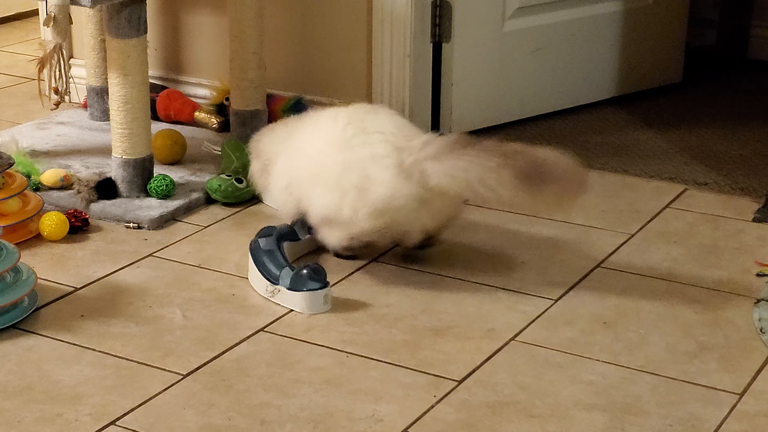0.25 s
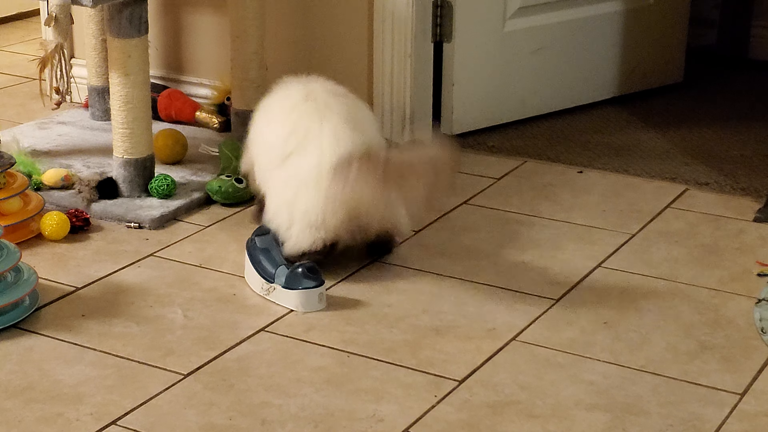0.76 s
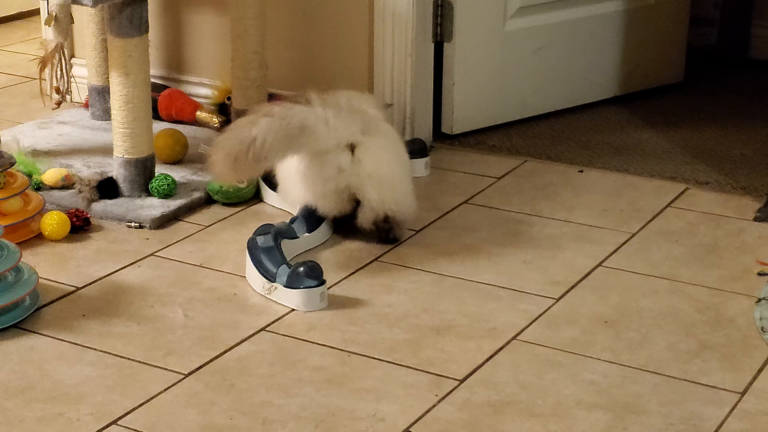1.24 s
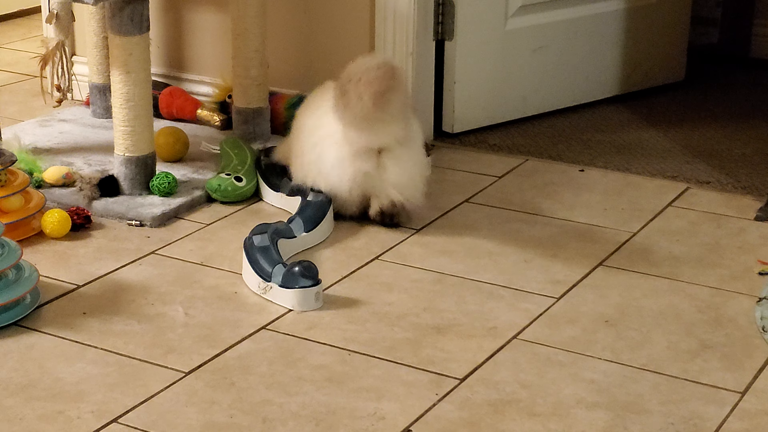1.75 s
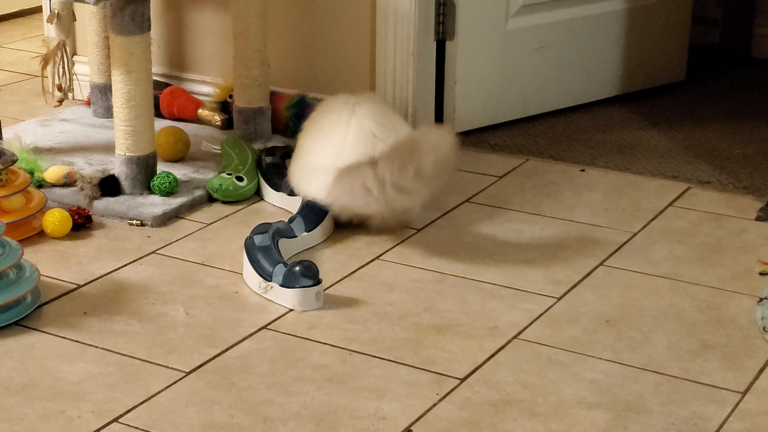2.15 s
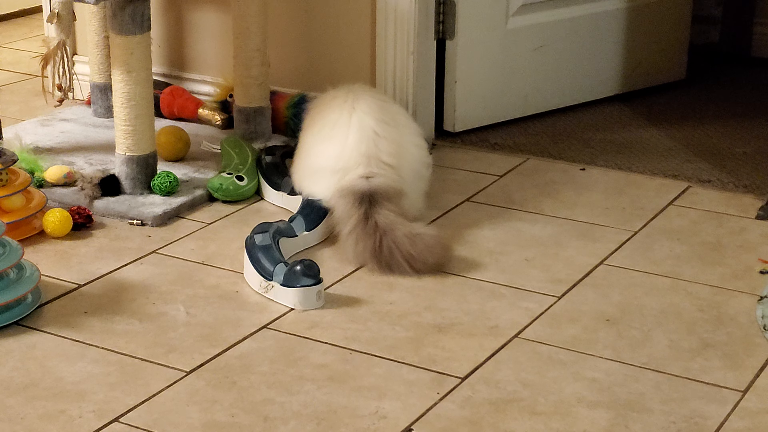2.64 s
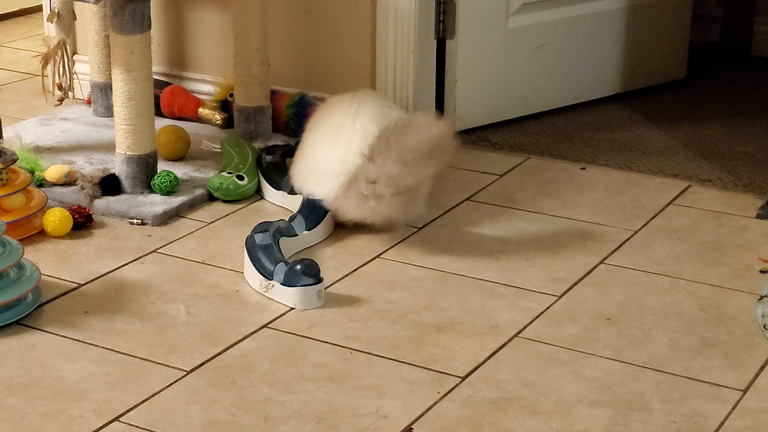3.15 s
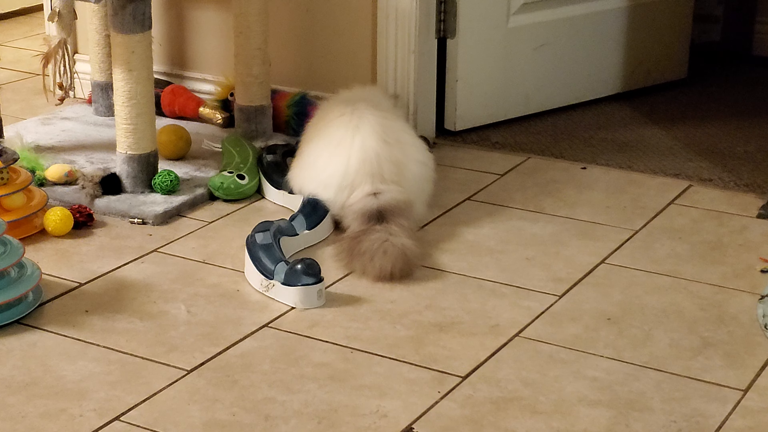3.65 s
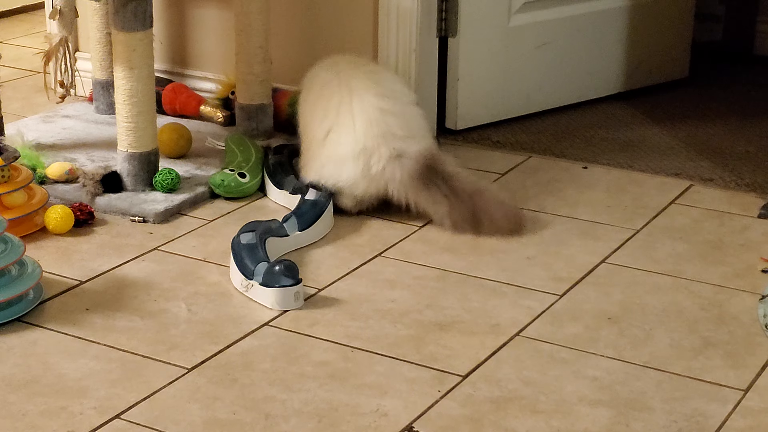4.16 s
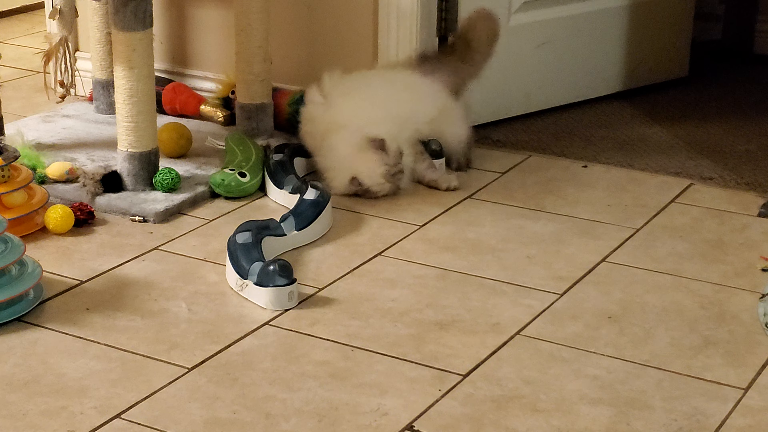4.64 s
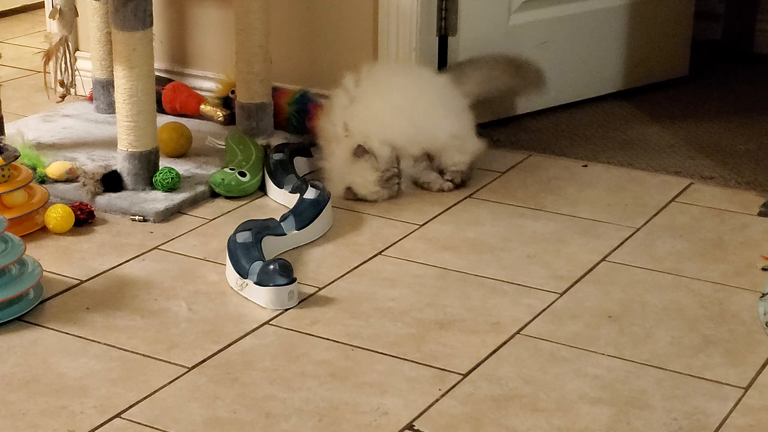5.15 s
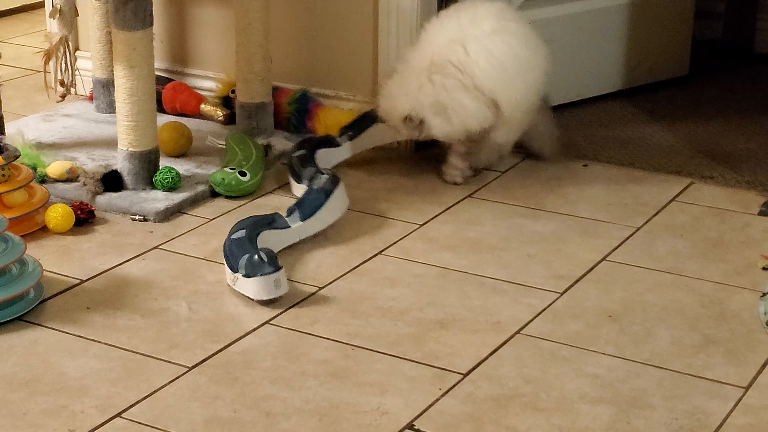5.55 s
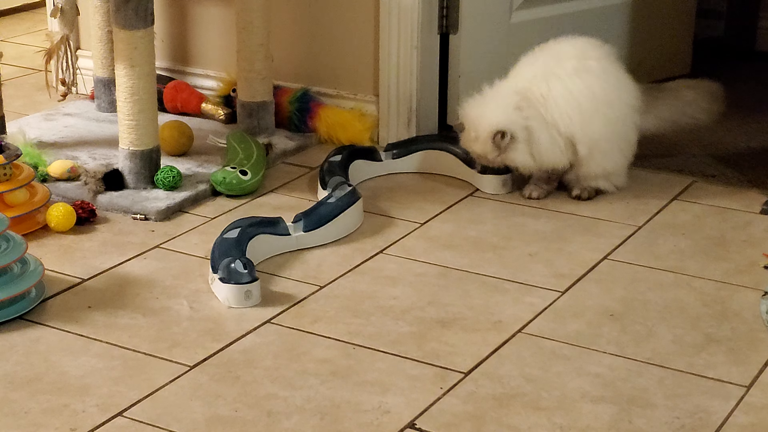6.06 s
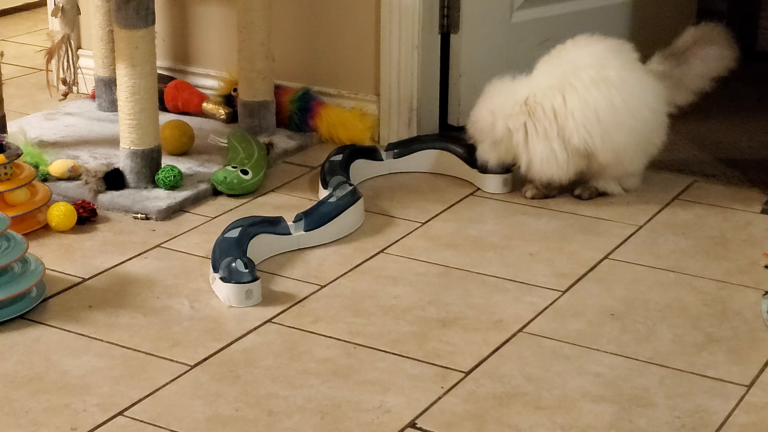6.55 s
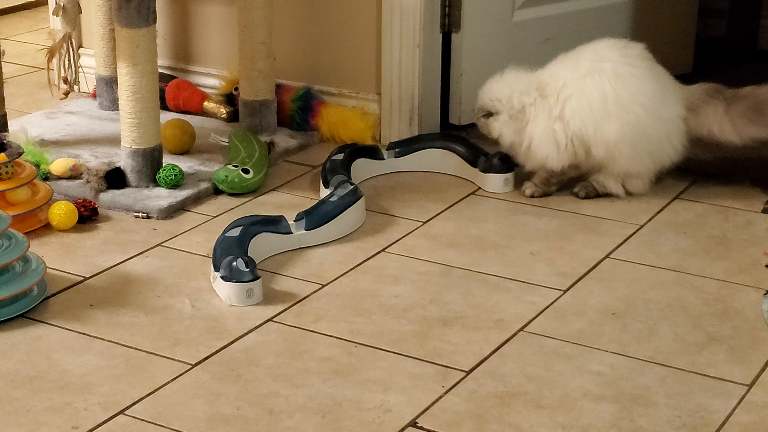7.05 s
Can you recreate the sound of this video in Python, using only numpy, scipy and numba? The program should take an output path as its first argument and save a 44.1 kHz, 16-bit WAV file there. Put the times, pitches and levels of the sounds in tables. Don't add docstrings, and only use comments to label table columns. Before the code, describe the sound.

A cat bats a ball in a hollow plastic track toy on a tiled floor. A busy cluster of clacks, ticks and short scrapes comes first, then sparser, softer taps, then loud isolated cracks and knocks as the track is pushed, ending in faint taps. A fridge-like hum runs beneath. Bare reflective room, phone microphone a few metres away.

```python
import sys
import numpy as np
from scipy import signal
from scipy.fft import rfft, irfft
from scipy.io import wavfile
from scipy.ndimage import uniform_filter1d
from numba import njit

SR = 44100
rng = np.random.default_rng(int(sys.argv[2]) if len(sys.argv) > 2 else 0)


def volts_from_db(level):
    exponent = np.asarray(level, float) / 20
    return 10 ** exponent


def file_out(sig):
    cols = np.atleast_2d(sig).T
    lim = np.clip(cols, -1, 1)
    pcm = np.round(lim * 32767).astype(np.int16)
    wavfile.write(sys.argv[1], SR, pcm)


N = 321930
BINS_HZ = np.linspace(0, SR / 2, 2049)

# frequency in Hz, level in dB per Hz.
AIR_SPECTRUM = [(20, -42), (38, -24), (50, -11), (85, -13.5), (230, -7), (400, -9.5), (700, -14.5),
                (1300, -26.5), (1600, -33), (2000, -32.5), (3200, -41), (4900, -39.5), (5900, -52.5),
                (8000, -53), (15000, -49)]
# frequency in Hz, rms level in dB, wobble in dB.
MOTOR_TONES = [(47, -77.5, 2.5), (59.2, -69, 6.5), (171, -75, 1.5), (218.2, -65.5, 6), (234.3, -66, -4),
               (386.6, -74, 1), (704.3, -60.5, 1.5), (1876, -95.5, 3.5), (4670, -101, -4),
               (4720, -96.5, -5)]
# time in seconds, level in dB.
LOAD_TONE = [(0.0, -86), (0.47, -74), (0.83, -83), (1.1, -64), (1.34, -69.5), (4.0, -63.5), (4.33, -59),
             (4.88, -66), (5.81, -61), (6.69, -66), (7.3, -62)]
# frequency in Hz, likeness from 0 to 1.
PORT_LIKENESS = [(100, 1), (290, 0.73), (640, .55), (1400, 0.02), (5000, 0.01)]
# frequency in Hz, left minus right in dB.
PORT_DIFFERENCE = [(60, -6.5), (110, -5.5), (200, -4), (380, -2), (700, -6), (1290, -1), (2380, 1),
                   (4400, -7), (8120, 2.5), (15000, -8)]
# frequency in Hz, time to fall 60 dB in seconds.
ROOM_T60 = [(200, 0.73), (1000, 0.4), (4000, 0.42), (12000, 0.34)]
# frequency in Hz, level in dB per Hz.
SHELL_SPECTRUM = [(200, -24.5), (500, -10), (800, -7.5), (1000, -1.5), (1400, -1), (2300, -4.5),
                  (2800, -11.5), (5000, -30), (16000, -70)]
# frequency in Hz, level in dB per Hz.
RIM_SPECTRUM = [(1500, -35.5), (2200, -2), (2600, 1), (2900, 1.5), (3250, 1), (3800, -1.5), (4500, -0.5),
                (5100, -5.5), (5800, -28), (16000, -75.5)]
# frequency in Hz, level in dB per Hz.
TREBLE_SPECTRUM = [(4500, -27.5), (5800, 1), (7000, -6), (8200, -13), (10000, -8.5), (13000, -15.5),
                   (16000, -14)]
# frequency in Hz, level in dB per Hz.
THUMP_SPECTRUM = [(100, -11), (200, -3.5), (450, -2.5), (600, 0.5), (800, 1.5), (1100, -10.5), (1600, -46)]
# full from in seconds, held for in seconds,
# level in dB, ring in Hz, brightness in dB.
SLIDES = [(0.17, 0.043, -44.5, 1580, -14.5), (0.345, 0.06, -33, 1170, -21.5), (0.43, 0.037, -44, 1270, -36),
          (0.635, 0.074, -42.5, 1250, -15), (0.79, .03, -43.5, 1900, -13.5),
          (0.855, 0.022, -39, 2250, -8.5), (0.93, 0.028, -47, 1090, -35), (1.35, .02, -51, 1300, -28),
          (1.445, 0.047, -43.5, 1740, -20), (2.77, 0.043, -62.5, 1280, -40), (3.95, 0.12, -50, 1400, -20.5),
          (5.535, .01, -36.5, 1240, -34.5), (5.8, .06, -45.5, 1450, -32.5), (5.94, 0.054, -59, 1520, -38.5),
          (6.41, 0.044, -53.5, 945, -42), (6.48, 0.085, -55, 1140, -34.5), (6.58, .03, -56, 940, -52),
          (6.87, .1, -59.5, 966, -58)]
# start in seconds, held for in seconds, level in dB,
# ring in Hz, brightness in dB.
SKIDS = [(0.0, 0.0044, -43.5, 920, -34), (1.095, 0.023, -35, 1780, -13), (1.722, 0.024, -42.5, 1720, -16),
         (2.015, 0.056, -54.5, 1470, -24), (2.245, 0.038, -45.5, 1210, -18),
         (2.462, 0.013, -40, 970, -30.5), (2.56, 0.071, -58, 1300, -24), (3.09, .02, -54.5, 1210, -59),
         (2.836, 0.034, -49.5, 1390, -28), (3.634, 0.029, -51.5, 1247, -33.5),
         (6.612, 0.004, -51.5, 993, -46), (7.03, 0.0083, -51.5, 1284, -17)]
# start in seconds, peak in dB, ring in Hz.
TICKS = [(0.3324, -38, 3790), (0.406, -31, 3530), (0.6519, -34, 4380), (0.834, -30, 4370),
         (0.8902, -30, 4500), (1.114, -38, 3340), (2.0107, -50, 4550), (2.613, -50, 3900),
         (3.6326, -60, 3180), (3.9672, -55, 4700), (7.029, -40.5, 3270)]
# start in seconds, peak in dB, ring in Hz.
HOLLOW_TAPS = [(0.009, -38.5, 937), (0.315, -30, 840), (0.344, -26, 754), (0.361, -25, 850),
               (0.384, -23.5, 870), (0.424, -36, 735), (0.693, -34.5, 690), (0.959, -36, 1020),
               (2.019, -45, 1100), (2.246, -40, 1250), (2.466, -38, 960), (2.482, -39, 990),
               (3.094, -47.5, 700), (5.561, -38, 1030), (5.661, -18, 1050), (5.672, -20, 1054),
               (6.419, -48, 690), (6.624, -56, 720), (6.861, -45, 1052), (6.904, -50, 1090),
               (0.126, -41, 612), (0.372, -48, 550), (2.222, -47, 637), (2.49, -46, 587),
               (5.545, -35.5, 495), (4.515, -24, 790), (4.29, -28, 1130), (3.559, -55, 1050)]
# start in seconds, peak in dB, ring in Hz, brightness in dB.
OPEN_KNOCKS = [(0.453, -22, 1550, -48), (0.997, -27, 1600, -11), (1.093, -28.5, 2150, -25),
               (1.117, -27, 1640, -13), (1.338, -38.5, 1800, -41), (1.745, -34.5, 1410, -18),
               (1.771, -30, 2020, -36), (1.796, -43, 1960, -43), (2.54, -43, 1490, -19.5),
               (2.834, -40, 1380, -33), (3.635, -54, 1220, -38), (5.661, -16, 1203, -25),
               (5.71, -32, 1030, -46), (5.84, -33.5, 2130, -38.5), (5.86, -39.5, 2160, -31),
               (5.931, -33.5, 1630, -35), (6.449, -44, 1480, -47.5), (6.62, -53, 1070, -51)]
# start in seconds, peak in dB, ring in Hz, brightness in dB.
SHADED_KNOCKS = [(0.047, -48.5, 1010, -50), (2.014, -42, 1130, -35), (2.242, -35.5, 1520, -35),
                 (2.465, -38, 930, -28), (2.482, -38, 974, -38), (3.09, -54, 1360, -53),
                 (3.874, -43, 1030, -58), (4.076, -22, 2000, -24.5), (4.094, -25.5, 2220, -30),
                 (5.433, -39.5, 1404, -27), (5.509, -32.5, 1880, -53), (6.034, -20, 1600, -19),
                 (6.404, -47, 856, -45), (7.069, -39.5, 1020, -28)]
# start in seconds, peak in dB, ring in Hz, brightness in dB.
HIDDEN_KNOCKS = [(0.174, -52, 1720, -6), (0.313, -20.5, 805, -38), (0.619, -35, 990, -17),
                 (0.831, -33, 2310, -10), (0.889, -33, 1970, -19), (1.72, -47, 1380, -20),
                 (2.621, -43.5, 1450, -39.5), (3.746, -38.5, 1370, -37), (4.27, -12.5, 1600, -22),
                 (4.51, -11, 2540, -18.5), (5.452, -52, 1900, -33), (5.534, -23.5, 1390, -35),
                 (5.822, -50.5, 1360, -46), (5.954, -48, 1910, -12), (5.988, -10.5, 1710, -20),
                 (6.493, -40.5, 1097, -33), (6.858, -66.5, 1075, -48), (7.031, -39, 1320, -22)]


def along(table, hz):
    table_hz, values = np.transpose(table)
    return np.interp(np.log(hz + 1), np.log(table_hz), values)


def level(x, db):
    return x * volts_from_db(db) / np.sqrt(np.mean(x ** 2))


def shape(table):
    return level(volts_from_db(along(table, BINS_HZ)), 0)


def resonance(hz, sharp):
    return 1 / (1 + (sharp * (BINS_HZ / hz - hz / (BINS_HZ + 1))) ** 2)


def minimum_phase(gain):
    cepstrum = irfft(np.log(gain))
    cepstrum[1:2048] *= 2
    cepstrum[2049:] = 0
    return irfft(np.exp(rfft(cepstrum)))[:1024]


def colour(x, table):
    return signal.oaconvolve(x, minimum_phase(shape(table)))[:len(x)]


@njit
def moving_resonance(x, hz, sharp):
    y, band, low = np.empty(len(x)), 0., 0.
    for i in range(len(x)):
        g = np.tan(np.pi * hz[i] / SR)
        v = (band + g * (x[i] - low)) / (1 + g * (g + 1 / sharp))
        band, low, y[i] = 2 * v - band, low + 2 * g * v, v / sharp
    return y


def pair(size):
    mid, side = rfft(rng.standard_normal((2, size)))
    alike = np.clip(along(PORT_LIKENESS, np.fft.rfftfreq(size, 1 / SR)), 0, 1)
    shared = np.sqrt((1 + alike) / 2) * mid
    own = np.sqrt((1 - alike) / 2) * side
    return irfft(np.array([shared + own, shared - own]), size)


def walk(rate):
    k = int(SR / rate)
    held = np.repeat(rng.standard_normal(N // k + 1), k)
    return 1.06 * uniform_filter1d(uniform_filter1d(held, k), k)[:N]


def hum():
    t = np.arange(N) / SR
    load_db = np.interp(t, *np.transpose(LOAD_TONE)) - 1.5
    tones = 0
    for hz, db, wobble_db in MOTOR_TONES + [(118.0, load_db, 0.64)]:
        swing = volts_from_db(db + wobble_db * walk(9))
        tones = tones + swing * np.sqrt(2) * np.sin(2 * np.pi * (hz * t + rng.random()))
    air_gain = volts_from_db(along(AIR_SPECTRUM, np.fft.rfftfreq(N, 1 / SR)))
    air = irfft(rfft(pair(N)) * air_gain, N)
    return tones + level(air, -59) * volts_from_db(1.1 * walk(4.1))


def room():
    size = 24000
    t = np.arange(size) / SR
    spectrum, hz = rfft(pair(size)), np.fft.rfftfreq(size, 1 / SR) + 1
    tail = 0
    for centre in 125 * 2. ** np.arange(8):
        octave = np.cos(np.pi / 2 * np.clip(np.log2(hz / centre), -1, 1)) ** 2
        decay = volts_from_db(-60 * t / along(ROOM_T60, centre))
        tail = tail + irfft(spectrum * octave, size) * decay
    lumps = np.repeat(np.clip(rng.standard_normal(size // 60 + 1), -2, 1.3), 60)
    lumps = uniform_filter1d(lumps, 60)[:size]
    build_up = 1 - np.exp(-(t / 0.0012) ** 2)
    tail *= volts_from_db(-23.0 + 1.8 * lumps * np.exp(-t / 0.077)) * build_up
    direct = 0.14 * pair(size) * np.exp(-t / 0.0018)
    direct[:, 0] = 0.67
    return direct, tail


def contact():
    t = np.arange(0, N + 44, 44) / SR
    power, hz, bright_db = 1e-30, 1.5e-27, 0
    fade = 272
    for rows, rise in ((SLIDES, 317.5), (SKIDS, 2998)):
        for s, held, db, ring_hz, row_db in rows:
            before, after = np.maximum(s - t, 0), np.maximum(t - s - abs(held), 0)
            p = volts_from_db(2 * (db - rise * before - fade * after))
            power, hz, bright_db = power + p, hz + p * ring_hz, bright_db + p * row_db
    curves = (np.sqrt(power), hz / power, bright_db / power)
    return [np.interp(np.arange(N) / SR, t, curve) for curve in curves]


def scrapes(spots):
    grain_db = np.clip(3.2 * rng.standard_normal(N), -9, 9) + 3.96 * walk(140)
    grains = (rng.random(N) < 1500 / SR) * volts_from_db(grain_db)
    low, rim, top, thud = (level(grains * rng.choice([-1., 1.], N), 0) for _ in range(4))
    drag, hz, bright_db = contact()
    drag = drag * volts_from_db(-16.5)
    rim_gain = volts_from_db(9.5 + 0.58 * bright_db)
    treble_gain = volts_from_db(bright_db + 5.0)
    rung = moving_resonance(moving_resonance(drag * low, hz, 0.52), hz, 0.66)
    sound = colour(0.49 * drag * low + volts_from_db(4.0) * rung, SHELL_SPECTRUM)
    sound += colour(drag * rim_gain * rim, RIM_SPECTRUM)
    sound += colour(drag * treble_gain * top, TREBLE_SPECTRUM)
    sound += colour(drag * volts_from_db(-4.5) * thud, THUMP_SPECTRUM)
    place = np.pi / 2 * walk(12)
    out = 0
    for share, (direct, tail) in zip((np.cos(place), np.sin(place)), spots):
        response = volts_from_db(6.5) * direct + tail
        out = out + signal.oaconvolve((share * sound)[None], response)[:, :N]
    return out


def shell(hz, bright_db):
    lifted = (1 + volts_from_db(-3.0) * resonance(hz, 2.7)) * shape(SHELL_SPECTRUM)
    low_cut = np.sqrt(1 + (0.56 * hz / (BINS_HZ + 1)) ** 4)
    clack = level(lifted / low_cut, 0)
    rim = volts_from_db(5.5 + 0.49 * bright_db) * shape(RIM_SPECTRUM)
    treble = volts_from_db(bright_db - 3.0) * shape(TREBLE_SPECTRUM)
    thump = volts_from_db(-17.0) * shape(THUMP_SPECTRUM)
    return np.sqrt(clack ** 2 + rim ** 2 + treble ** 2 + thump ** 2)


def knocks(spots):
    size = 2 ** 15
    out, spots = np.zeros((2, N + size)), rfft(spots, size)
    views = ((OPEN_KNOCKS, 2), (SHADED_KNOCKS, -3.4), (HIDDEN_KNOCKS, -5))
    rows = sorted((*row, direct_db) for table, direct_db in views for row in table)
    blows = []
    for s, db, hz, bright_db, direct_db in rows:
        blows.append((s, volts_from_db(db + 11.5) * shell(hz, bright_db), direct_db))
    for s, db, hz in TICKS:
        blows.append((s, level(resonance(hz, 13.0) + 0.001, db + 5.0), 5.0))
    for s, db, hz in HOLLOW_TAPS:
        blows.append((s, level(resonance(hz, 5.2) + 0.00092, db + 9.0), 1.5))
    for k, (s, gain, direct_db) in enumerate(blows):
        direct, tail = spots[k % len(spots)]
        at = int(s * SR)
        response = volts_from_db(direct_db) * direct + tail
        out[:, at:at + size] += irfft(rfft(minimum_phase(gain), size) * response)
    return out[:, :N]


def scene():
    spots = [room() for _ in range(6)]
    return knocks(spots) + scrapes(spots[1:3]) + hum()


def top_cut(x):
    return signal.sosfilt(signal.butter(12, 16500, fs=SR, output="sos"), x)


def record(dry):
    hz = np.fft.rfftfreq(N, 1 / SR)
    half_db = along(PORT_DIFFERENCE, hz) / 2
    port_gain = volts_from_db(np.array([half_db, -half_db])) * (hz < 15830)
    mix = irfft(rfft(dry) * port_gain, N)
    return top_cut(mix)


dry = scene()
out = record(dry)
file_out(out)
```